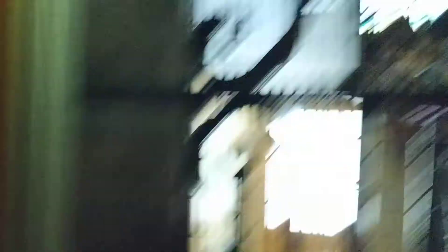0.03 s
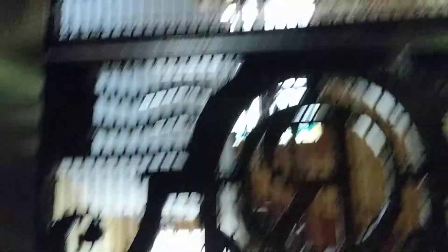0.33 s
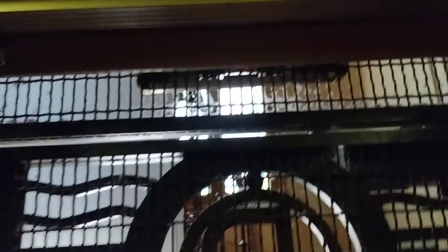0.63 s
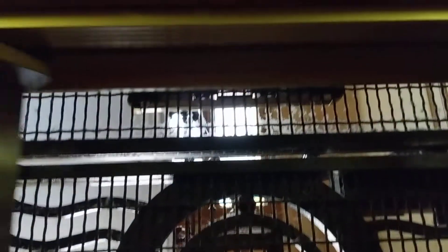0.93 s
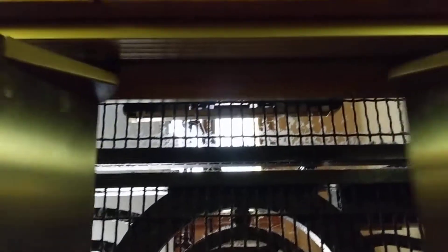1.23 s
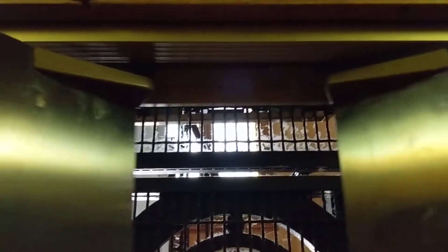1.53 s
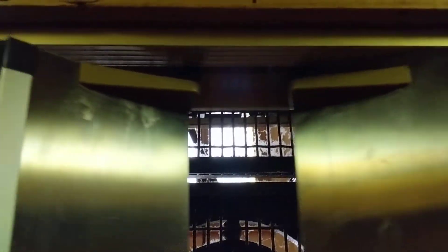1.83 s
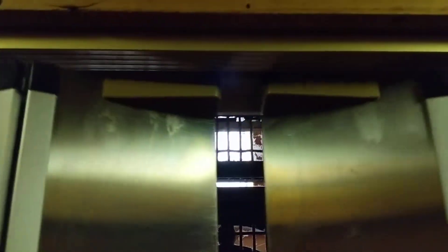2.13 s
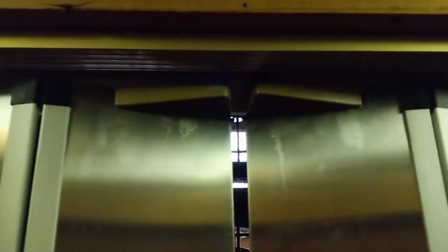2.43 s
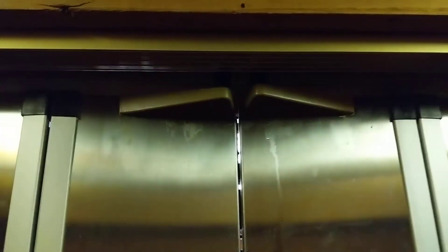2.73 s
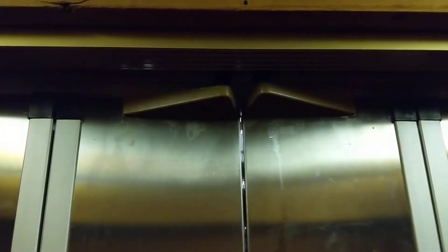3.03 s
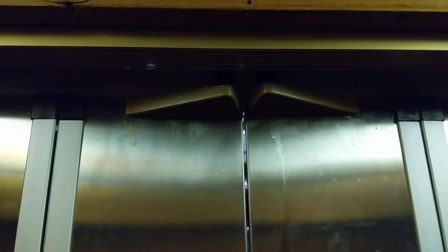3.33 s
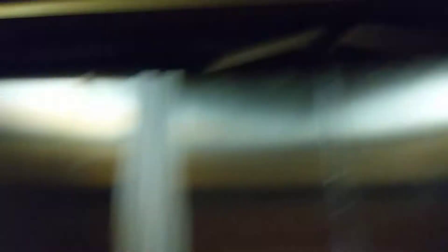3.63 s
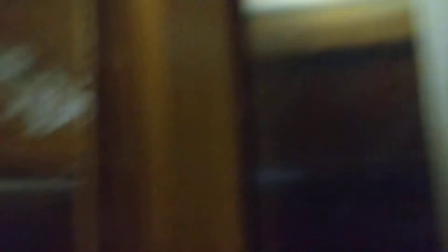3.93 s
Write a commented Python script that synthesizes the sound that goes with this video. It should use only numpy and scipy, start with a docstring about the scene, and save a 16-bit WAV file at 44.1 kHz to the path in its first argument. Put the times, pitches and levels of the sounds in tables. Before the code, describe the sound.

Folding steel elevator doors rattle and knock shut, with a latch click over a low hum.

```python
"""The folding steel doors of a small lift knock shut, heard from inside the cabin.
Hinges and rollers strike, ringing the steel leaves and making the cabin boom; the floor thuds,
dry hinges squeak, the linkage ticks, and a latch clicks and rings as the leaves meet.
The leaves swish and rumble along their track; a mains hum and a faint hiss go on underneath."""
import sys
import numpy as np
from scipy import signal
from scipy.fft import rfft, irfft
from scipy.io import wavfile
from scipy.ndimage import uniform_filter1d

SR = 44100
rng = np.random.default_rng(int(sys.argv[2]) if len(sys.argv) > 2 else 0)


def dump(signal):
    """Clip the signal to [-1, 1] and save it as 16-bit WAV at the path in sys.argv[1]."""
    limited = np.clip(np.atleast_2d(signal).T, -1, 1)
    pcm = np.round(limited * 32767).astype(np.int16)
    wavfile.write(sys.argv[1], SR, pcm)


N = 176400


def undb(db):
    return 10 ** (np.asarray(db) / 20)


def curve(rows):
    """Fader ride through (time [s], level [dB]) points."""
    return undb(np.interp(np.arange(N) / SR, *np.array(rows).T))


def noise(gain_of_hz, size):
    """Noise of rms 1 with the given spectrum."""
    hz = np.fft.rfftfreq(size, 1 / SR) + 1e-3
    y = irfft(rfft(rng.standard_normal(size)) * gain_of_hz(hz), size)
    return y / y.std()


def coloured(points):
    """Steady noise of rms 1, shaped by (frequency [Hz], relative level [dB]) points."""
    hz, db = np.array(points).T
    return noise(lambda f: undb(np.interp(np.log(f), np.log(hz), db)), size=N)


def band(f, lo_hz, hi_hz):
    """Steep band-pass gain."""
    return 1 / np.sqrt((1 + (lo_hz / f) ** 12) * (1 + (f / hi_hz) ** 30))


def resonance(f, hz, width):
    """Gain of one resonance with steep skirts."""
    return 1 / (1 + (2 * (f - hz) / width) ** 2)


def walk(rate_hz):
    """Smooth random wandering, spread 1."""
    span = max(int(SR / rate_hz), 1)
    y = uniform_filter1d(rng.standard_normal(N), span, mode="wrap")
    y = uniform_filter1d(y, span, mode="wrap")
    return y / y.std()


def fade(t, t60):
    return np.exp(-np.log(1000) * t / t60)


def rise(t, attack_s):
    return 1 - np.exp(-t / attack_s)


def ring(t, hz, db, t60):
    """One struck mode."""
    return np.sqrt(2) * undb(db) * np.sin(2 * np.pi * hz * t) * fade(t, t60)


def burst(carrier, envelope):
    """Noise under an envelope, scaled to the envelope's energy."""
    y = carrier * envelope
    return y * np.sqrt(np.sum(envelope ** 2) / np.sum(y ** 2))


def add(out, start_s, sound):
    """Mix a sound in at its time."""
    i = max(int(start_s * SR), 0)
    out[i:i + len(sound)] += sound[:N - i]


HUM_HZ, HUM_WAVER, OCTAVE_DB, AIR_DB = 100.03, 0.0021, -67, -63
# mains hum, louder in some places of the cabin (time [s], level [dB])
HUM_RIDE = [(0, -56), (.6, -48), (1.3, -49), (1.8, -49.5), (2.2, -51.5), (3.5, -52.5), (3.62, -35),
            (3.69, -35), (3.735, -50.5), (3.79, -34.5), (4, -38.5)]
# room tone of the shaft (frequency [Hz], relative level [dB])
AIR_COLOUR = [(30, 9), (60, -0.5), (120, 7), (250, -27), (600, -29), (1200, -19), (2100, -23.5),
              (4000, -20.5), (6000, -26), (8000, -43), (10000, -30), (15500, -31.5)]
def background():
    """The bed: a slightly wavering mains hum with its octave, over the still air of the shaft."""
    pitch_hz = HUM_HZ * (1 + HUM_WAVER * walk(rate_hz=4.2))
    phase = 2 * np.pi * np.cumsum(pitch_hz) / SR
    hum = np.sqrt(2) * (curve(HUM_RIDE) * np.sin(phase) + undb(OCTAVE_DB) * np.sin(2 * phase))
    return hum + undb(AIR_DB) * coloured(AIR_COLOUR)


SWISH_GRAIN_DB, SWISH_FLUTTER_DB, RUMBLE_ROUGH_DB = 0.8, 0.27, 1.5
# swells of the swish, including the bright hiss that trails the knocks near 0.7 s and 1 s (time [s], level
# [dB])
SWISH_RIDE = [(0, -63.5), (.14, -60.5), (.3, -60), (.47, -61.5), (.54, -51.5), (.58, -60), (.65, -61),
              (.705, -46.5), (.76, -58), (.85, -68), (.91, -57.5), (.97, -48), (1.01, -47), (1.08, -55),
              (1.2, -62.5), (1.3, -58.5), (1.48, -69), (1.65, -71.5), (2.1, -72.5), (3.5, -74), (3.75, -68),
              (3.88, -62.5), (4, -60)]
# tone of the swish (frequency [Hz], relative level [dB])
SWISH_COLOUR = [(300, 9.5), (900, 2), (1400, -0.5), (2100, 4.5), (3200, -3), (5500, -6.5), (6900, -3),
                (7900, 2.5), (8700, -8), (10000, -20.5), (15500, -30)]
# swells of the rollers in their track (time [s], level [dB])
RUMBLE_RIDE = [(0, -34.5), (.17, -39), (.3, -44.5), (.65, -43), (.78, -32.5), (1.05, -37), (1.15, -38.5),
               (1.38, -35.5), (1.6, -39), (1.95, -44.5), (2.15, -50), (2.55, -51), (3.1, -42.5),
               (3.5, -53.5), (3.63, -46.5), (3.8, -45.5), (4, -52)]
# bass-heavy tone of the rollers (frequency [Hz], relative level [dB])
RUMBLE_COLOUR = [(22, -53), (36, -21.5), (50, 6.5), (72, 6), (100, 6), (135, -12), (180, -5.5),
                 (220, -26.5), (370, -27), (600, -30.5), (1100, -35), (2200, -38), (5000, -76.5)]
def sliding():
    """The leaves swish with a fine grain while their rollers rumble unevenly."""
    swish = coloured(SWISH_COLOUR) * curve(SWISH_RIDE)
    grain = undb(SWISH_GRAIN_DB * walk(rate_hz=300) + SWISH_FLUTTER_DB * walk(rate_hz=30))
    rumble = coloured(RUMBLE_COLOUR) * curve(RUMBLE_RIDE)
    roughness = undb(RUMBLE_ROUGH_DB * walk(rate_hz=17))
    return swish * grain + rumble * roughness


LATCH_S, LATCH_CLICK_DB, SPRING_ATTACK_CYCLES = 2.876, -53, 9
# ring of the latch spring (frequency [Hz], width [Hz], level [dB], t60 [s])
SPRING_MODES = [(1620, 130, -54.5, 0.34), (2410, 230, -59, 0.16), (4400, 400, -70, 0.16),
                (5850, 660, -59, 0.15), (7150, 2100, -52, 0.12), (11000, 700, -58, 0.033),
                (14500, 1500, -66, .05)]
def latch():
    """The latch snaps in and its spring rings on, blurred by the cabin."""
    out, t = np.zeros(N), np.arange(SR // 2) / SR
    click = noise(lambda f: band(f, lo_hz=2020, hi_hz=9600), size=len(t))
    add(out, LATCH_S, undb(LATCH_CLICK_DB) * burst(click, fade(t, t60=0.033)))
    for hz, width, db, t60 in SPRING_MODES:
        spring = noise(lambda f: resonance(f, hz, width), size=len(t))
        envelope = fade(t, t60) * rise(t, SPRING_ATTACK_CYCLES / hz)
        add(out, LATCH_S, undb(db) * burst(spring, envelope))
    return out


TICK_WIDTH_HZ = 1100
# light ticks of the linkage (time [s], level [dB], centre [Hz])
TICKS = [(1.148, -59.5, 5880), (1.429, -61, 7600), (1.51, -58.5, 6500), (1.691, -66, 8300),
         (2.516, -59.5, 7760), (2.714, -64, 7500)]
def ticks():
    """The linkage clicks: small, bright bursts of narrow noise."""
    out, t = np.zeros(N), np.arange(SR // 2) / SR
    envelope = fade(t, t60=0.07) * rise(t, attack_s=0.00084)
    for start, db, hz in TICKS:
        click = noise(lambda f: resonance(f, hz, TICK_WIDTH_HZ), size=len(t))
        add(out, start, undb(db) * burst(click, envelope))
    return out


RASP_DB, RASP_WIDTH = -7.5, 0.38  # level against the note, width as a share of the pitch
# squeaks and groans of the hinges (time [s], pitch [Hz], level [dB], attack [s], t60 [s])
SQUEAKS = [(.015, 289, -43.5, 0.014, 0.38), (.052, 793, -47.5, 0.0054, 0.13),
           (.125, 906, -42.5, 0.0034, 0.13), (.11, 464, -49.5, 0.012, 0.56),
           (.258, 542, -38, 0.0069, 0.054), (.742, 772, -39, 0.014, 0.26)]
def squeaks():
    """A dry hinge gives a short note wrapped in rasp."""
    out, t = np.zeros(N), np.arange(SR // 2) / SR
    for start, hz, db, attack_s, t60 in SQUEAKS:
        scrape = noise(lambda f: resonance(f, hz, RASP_WIDTH * hz), size=len(t))
        rasp = undb(db + RASP_DB) * scrape * fade(t, t60)
        add(out, start, (ring(t, hz, db, t60) + rasp) * rise(t, attack_s))
    return out


# dull thuds of the floor (time [s], pitch [Hz], level [dB], attack [s], t60 [s])
THUDS = [(0, 74.8, -27, 0.021, 0.6), (0.714, 78, -23.5, 0.006, 0.34), (0.991, 51.8, -40, 0.037, 0.45),
         (1.355, 76, -24.5, 0.015, 0.21), (3.591, 62, -34.5, 0.023, 0.38)]
def thuds():
    """The cabin floor flexes and booms, one low mode to a thud."""
    out, t = np.zeros(N), np.arange(SR) / SR
    for start, hz, db, attack_s, t60 in THUDS:
        add(out, start, ring(t, hz, db, t60) * rise(t, attack_s))
    return out


BOOM_DETUNE = 0.033  # spread as a share of the pitch
# low modes of the cabin (mean pitch [Hz], relative level [dB], t60 [s])
CABIN_MODES = [(52, -18, 0.17), (74, -18, 0.4), (87.46, -4.5, 0.5), (106.73, -1, 0.54), (128.6, -5.5, 0.3),
               (150.6, -15.5, 0.21), (176.5, -10.5, 0.36)]
def cabin_boom(t):
    """The weight under a knock: cabin modes swell in alternating polarity, detuned anew each hit."""
    detune = 1 + BOOM_DETUNE * rng.standard_normal(len(CABIN_MODES))
    boom = sum((-1) ** k * ring(t, hz * detune[k], db, t60)
               for k, (hz, db, t60) in enumerate(CABIN_MODES))
    return boom * rise(t, attack_s=0.017)


LEAF_TILT_DB_OCT = -4.5
# resonances of the steel leaves (frequency [Hz], width [Hz], height over the slope [dB])
LEAF_MODES = [(257.4, 30.6, 12.5), (347, 38, 7), (540, 17, 0.5), (599, 60, 8), (960, 71, 1), (1124, 23, -1),
              (1330, 60, -3), (1704, 136, 8), (2010, 160, 8), (2287, 110, 7.5), (2594, 130, 5.5),
              (2880, 30, 7), (3420, 51, 0), (3830, 160, 5), (7600, 520, 5)]
def leaf_colour(f):
    """Metallic tone of the leaves, as a gain: resonances on a falling slope."""
    peaks = sum((undb(db) - 1) * resonance(f, hz, width) for hz, width, db in LEAF_MODES)
    return (1 + peaks) * undb(LEAF_TILT_DB_OCT * np.log2(f))


# a knock has four bands, low to high: body, rap, clack, tick
BAND_EDGES_HZ = (210, 700, 1450, 3600, 8700)
BAND_ATTACK_S = (.003, .0012, .0007, .0006)
BAND_T60_SHARE = (1.08, 0.77, 0.54, 0.52)  # of the knock's base t60
TAIL_DB, TAIL_T60_S = -18, 0.58
NOTE_DB, NOTE_WIDTH = 10.5, 0.038  # boost, and width as a share of the pitch
CHATTER_DB, CHATTER_RATE_HZ = 2.2, 220
# hits of hinges, rollers and leaves (time [s], boom [dB], body [dB], rap [dB], clack [dB],
# tick [dB], base t60 [s], note of the struck part [Hz])
KNOCKS = [(.098, -41, -42, -50, -51.5, -66, 0.27, 450), (.127, -65, -45, -49, -50.5, -56.5, 0.27, 984),
          (0.286, -68, -55.5, -55, -54.5, -62.5, 0.16, 2200),
          (0.341, -44, -50.5, -68, -57, -56, 0.059, 2030), (0.498, -48, -63.5, -63, -58, -70, 0.65, 1630),
          (0.595, -35, -60, -62, -54.5, -70, 0.32, 2050), (.691, -31, -49, -54, -45.5, -48.5, 0.078, 1810),
          (.709, -28, -38.5, -51.5, -40.5, -54, 0.12, 1810), (.826, -32, -69, -61, -66, -67, 0.11, 780),
          (0.887, -44, -46.5, -47, -59.5, -68, 0.16, 372), (1.009, -34, -50.5, -46, -41, -48, 0.21, 3270),
          (1.172, -64, -55.5, -54, -59, -67, 0.097, 1270),
          (1.245, -30.5, -46.5, -47.5, -47, -58.5, 0.21, 2040),
          (1.265, -34.5, -60, -47.5, -46.5, -65, 0.093, 2150),
          (1.319, -33.5, -55, -48.5, -49, -64, 0.072, 1230), (1.413, -40, -54, -52.5, -63, -78, 0.31, 624),
          (1.508, -41.5, -54.5, -53, -55, -60.5, .16, 976), (1.575, -44.5, -54.5, -57, -71, -89, 0.13, 956),
          (1.779, -33.5, -56, -52.5, -48, -59, 0.28, 2067), (1.934, -54, -59.5, -56, -49, -60, 0.25, 1906),
          (1.990, -49, -57, -59.5, -57.5, -65.5, 0.078, 2040),
          (2.237, -57, -49.5, -52, -62, -89, 0.18, 597), (2.366, -58, -75, -62.5, -66, -76, 0.23, 1960),
          (2.397, -59, -60.5, -58, -52.5, -71, 0.2, 1830), (2.529, -69, -68.5, -68, -55.5, -56, 0.16, 2160),
          (2.623, -38, -56.5, -55, -50.5, -65, 0.28, 1760), (2.802, -47, -64, -64, -64.5, -90, 0.28, 2020),
          (2.981, -61, -68, -63, -64, -75, 0.14, 870), (3.014, -44, -59, -55, -65.5, -73, 0.54, 1076),
          (3.056, -33.5, -51.5, -58.5, -49, -58, 0.36, 1660), (3.17, -42, -55, -55, -65, -81, .18, 1120),
          (3.192, -40, -60, -60, -59, -84, 0.29, 2190), (3.406, -44.5, -63, -67, -69.5, -88, 0.46, 390),
          (3.747, -44, -66, -59, -63, -67, 0.1, 750)]
def knocks():
    """Each knock rings the struck part and the leaves' crowded modes, and sets the cabin booming."""
    out, t = np.zeros(N), np.arange(SR // 2) / SR
    f = np.fft.rfftfreq(len(t), 1 / SR) + 1e-3
    bands = [leaf_colour(f) * band(f, lo, hi) for lo, hi in zip(BAND_EDGES_HZ, BAND_EDGES_HZ[1:])]
    tail = undb(TAIL_DB) * fade(t, TAIL_T60_S)
    for start, boom_db, *band_levels, t60, note_hz in KNOCKS:
        add(out, start, undb(boom_db) * cabin_boom(t))
        # loose parts rattle against each other just after the hit
        chatter = undb(CHATTER_DB * walk(CHATTER_RATE_HZ)[:len(t)] * rise(t, attack_s=.008))
        note = 1 + (undb(NOTE_DB) - 1) * resonance(f, note_hz, NOTE_WIDTH * note_hz)
        for k, db in enumerate(band_levels):
            steel = noise(lambda _: bands[k] * note, size=len(t))
            decay = np.hypot(fade(t, t60 * BAND_T60_SHARE[k]), tail)
            envelope = rise(t, BAND_ATTACK_S[k]) * decay
            add(out, start, np.sqrt(2) * undb(db) * burst(steel * chatter, envelope))
    return out


def scene():
    """Mono mix, from the bed up to the knocks."""
    return (background() + sliding() + latch() + ticks() + squeaks() + thuds() + knocks())[None]


LOW_CUT_HZ, HIGH_CUT_HZ = 41, 15700
def record(dry):
    """Master EQ: trim the deepest bass and the very top."""
    low_cut = signal.butter(3, LOW_CUT_HZ, "highpass", fs=SR, output="sos")
    high_cut = signal.ellip(10, .2, 70, HIGH_CUT_HZ, fs=SR, output="sos")
    return signal.sosfilt(high_cut, signal.sosfilt(low_cut, dry))


dry = scene()
out = record(dry)
dump(out)
```